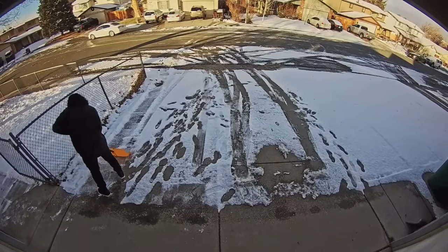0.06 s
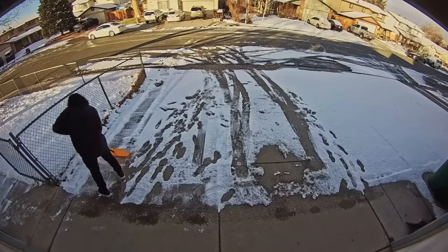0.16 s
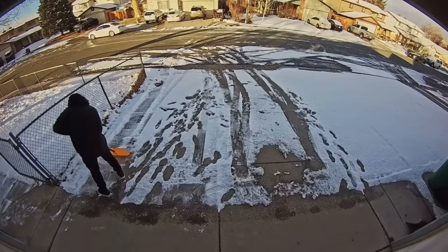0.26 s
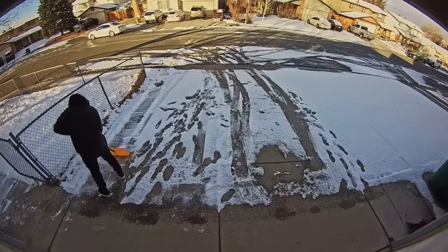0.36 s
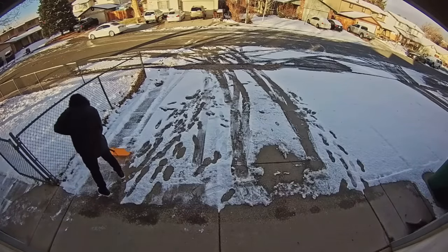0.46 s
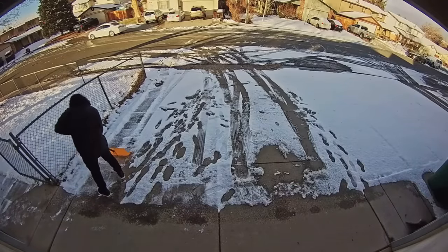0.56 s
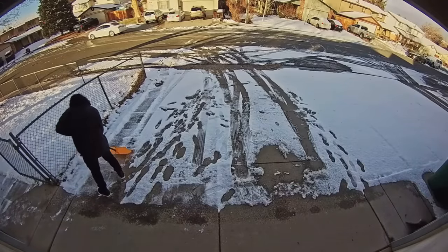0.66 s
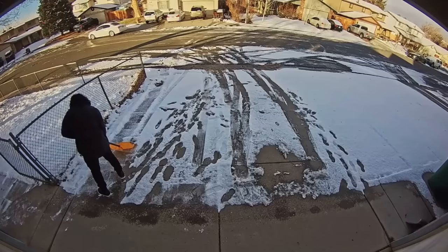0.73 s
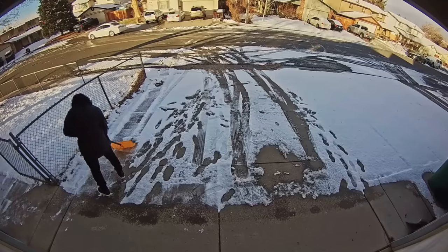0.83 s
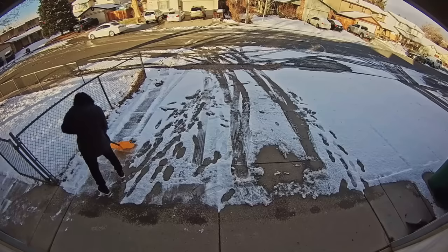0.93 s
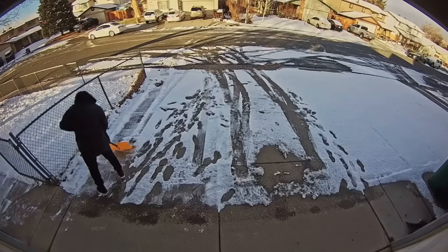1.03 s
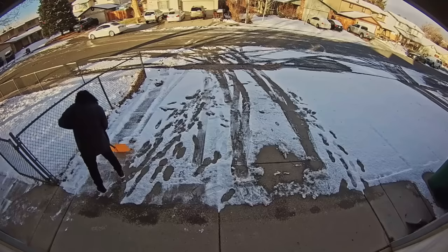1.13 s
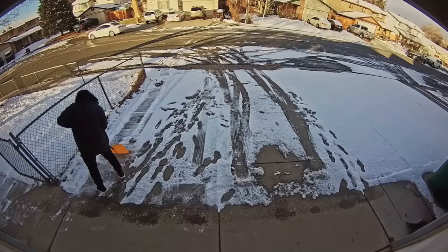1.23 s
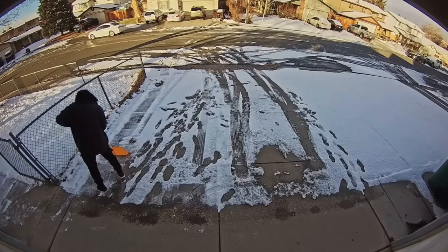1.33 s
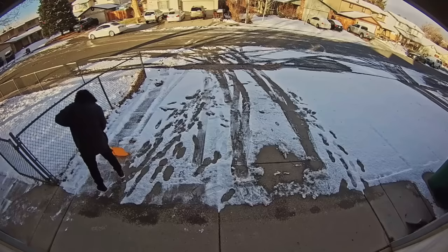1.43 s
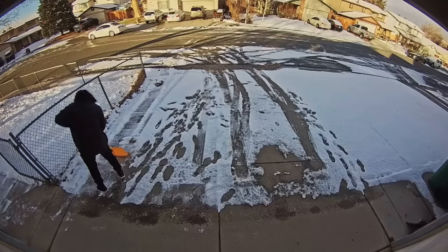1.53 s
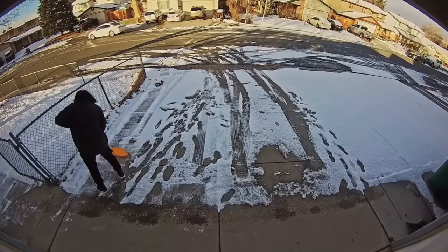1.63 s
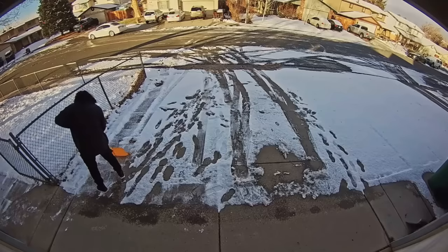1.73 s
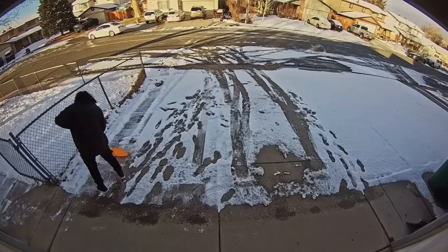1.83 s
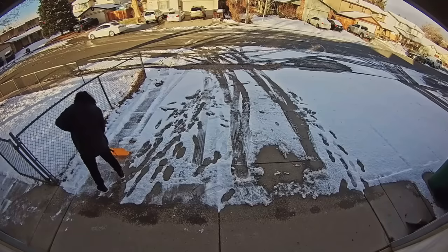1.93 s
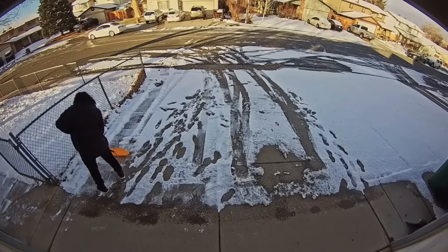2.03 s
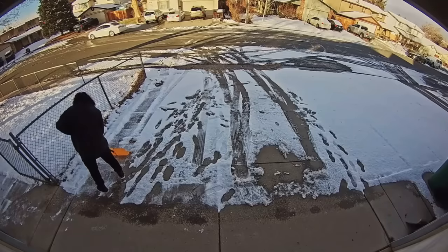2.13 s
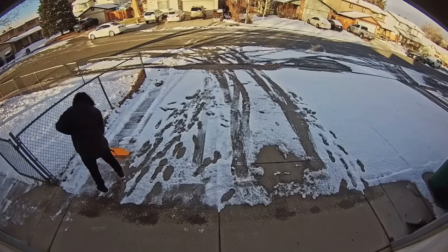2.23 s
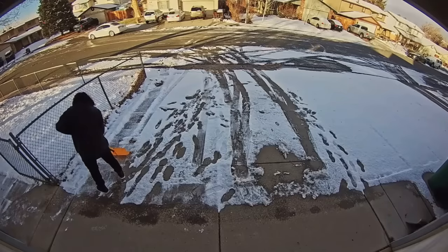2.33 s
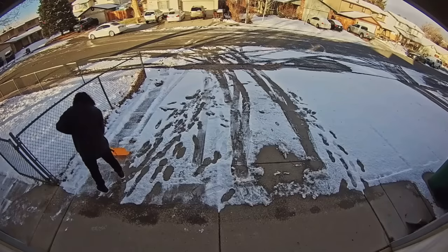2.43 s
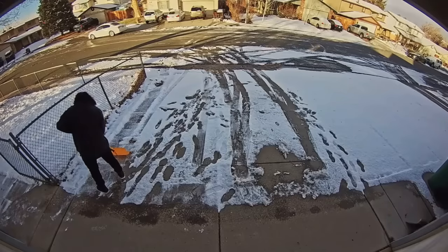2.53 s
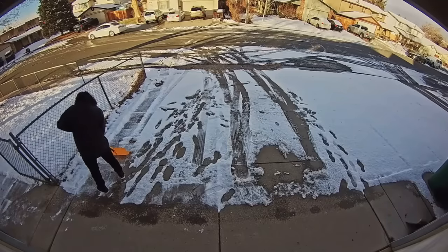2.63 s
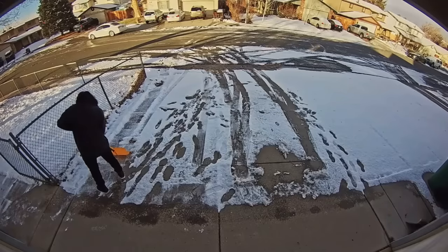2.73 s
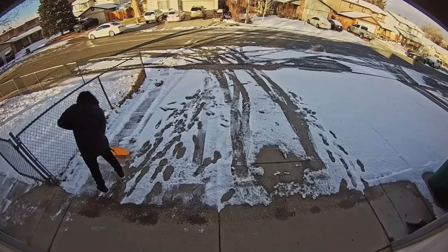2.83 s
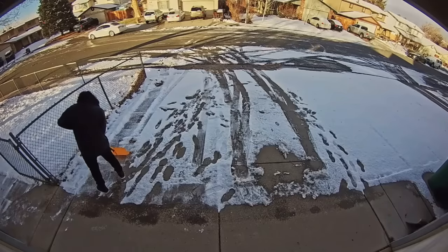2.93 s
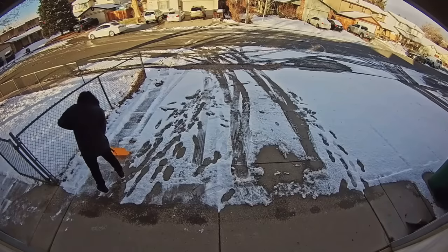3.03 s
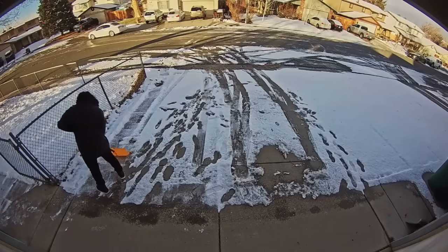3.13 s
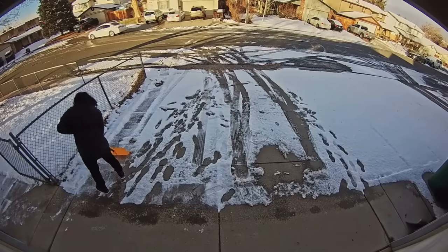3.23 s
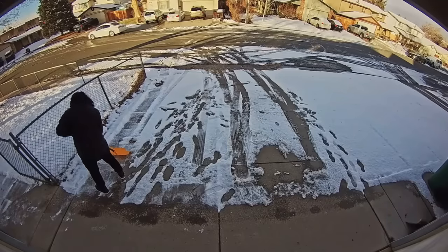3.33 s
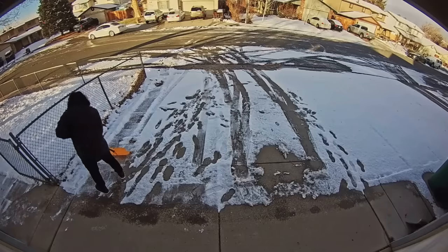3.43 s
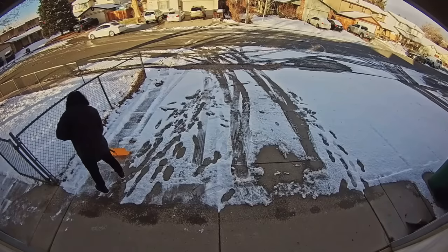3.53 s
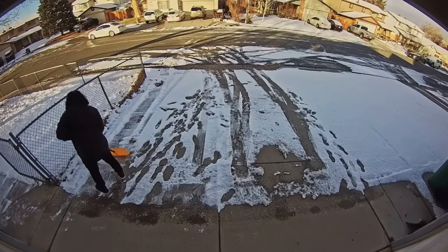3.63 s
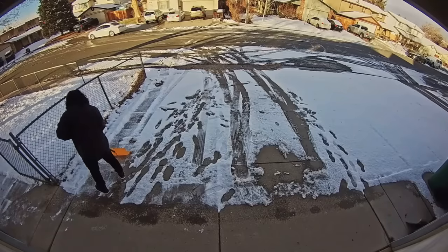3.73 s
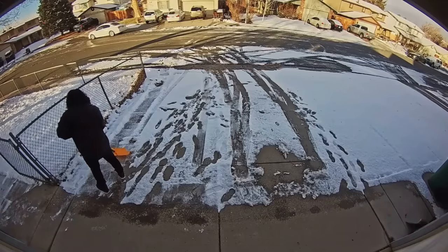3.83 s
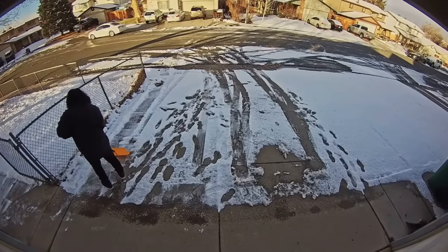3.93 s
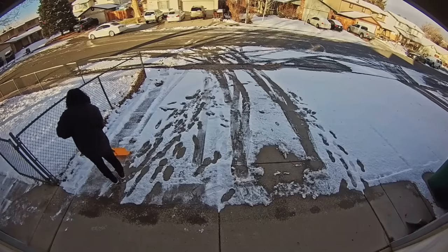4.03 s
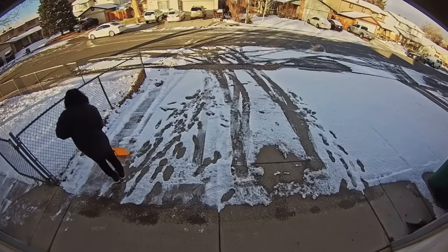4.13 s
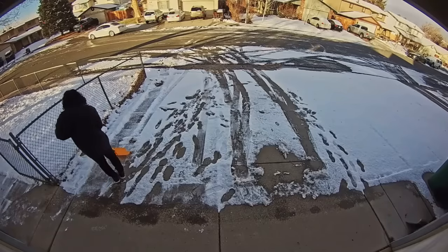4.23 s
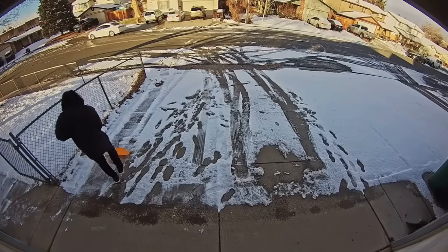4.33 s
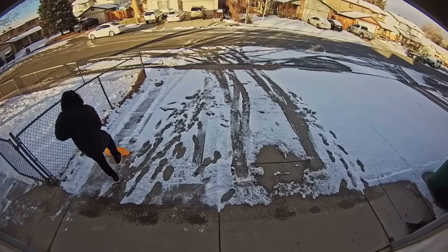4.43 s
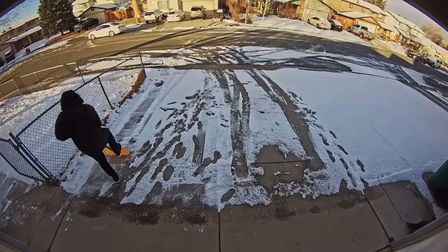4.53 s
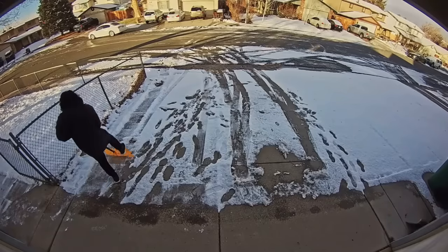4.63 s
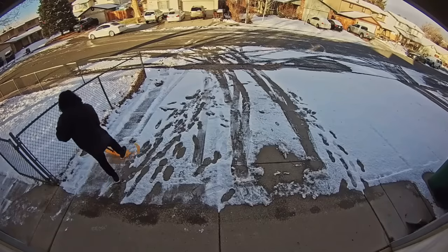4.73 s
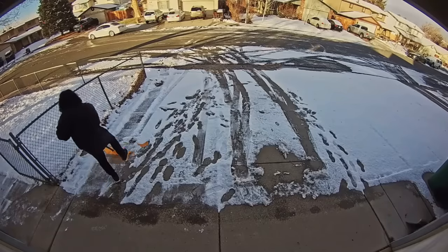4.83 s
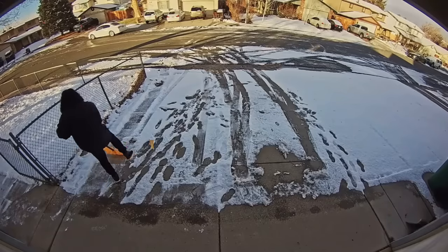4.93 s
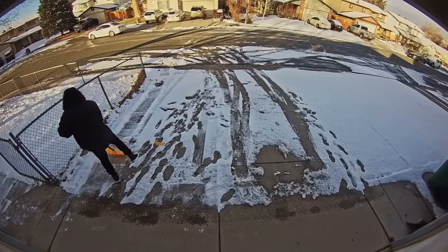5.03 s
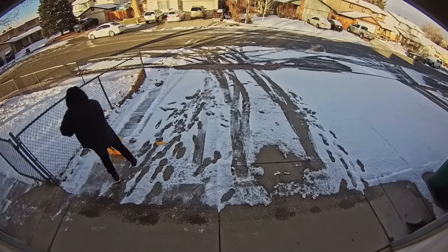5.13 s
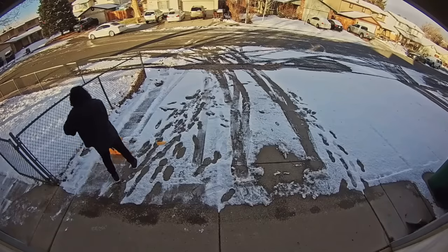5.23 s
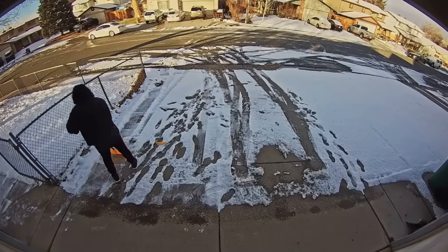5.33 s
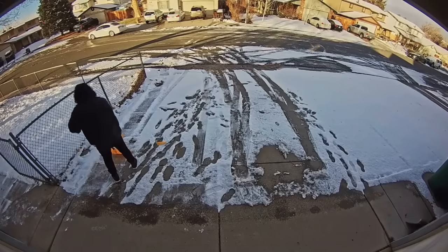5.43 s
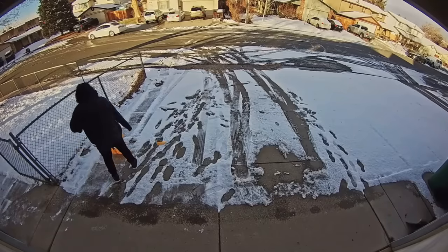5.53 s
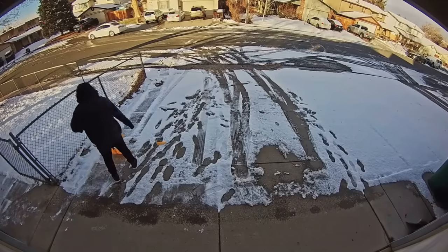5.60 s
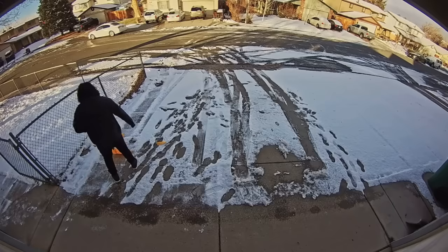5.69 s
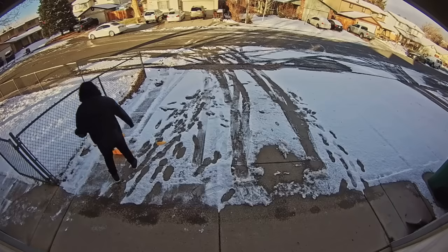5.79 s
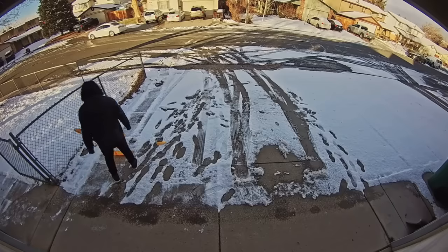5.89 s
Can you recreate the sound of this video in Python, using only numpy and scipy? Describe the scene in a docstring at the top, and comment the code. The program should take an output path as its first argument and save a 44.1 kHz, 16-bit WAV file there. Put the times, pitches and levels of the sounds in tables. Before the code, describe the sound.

Quick plastic scraping and catching on frozen ground, a few creaks, then a sudden violent crack and small clattering pieces outdoors.

```python
"""Snow shovel snapping on ice

A plastic snow shovel scrapes in short strokes over icy concrete, is pried, and is stamped on until it snaps.
A shard skitters off and the broken rest knocks on the ground; a car drones over a faint street hush.
Rubs are showers of tiny slips, and blows are clicks with splinters; both ring the modes of the plastic.
The car is a few sines, the street shaped noise; a narrow-band microphone limits and clips the loudest peaks."""
import sys
import numpy as np
from scipy import signal
from scipy.fft import rfft, irfft
from scipy.io import wavfile
from scipy.ndimage import uniform_filter1d

SR = 44100
rng = np.random.default_rng(int(sys.argv[2]) if len(sys.argv) > 2 else 0)


def inscribe(sig):
    """Save sig as 16-bit PCM at rate SR to the path in sys.argv[1].

    A 1-D sig is mono; a 2-D sig holds one channel per row.
    Samples are clipped to [-1, 1] before scaling.
    """
    pcm = np.round(np.clip(np.atleast_2d(sig).T, -1, 1) * 32767)
    wavfile.write(sys.argv[1], SR, pcm.astype(np.int16))


N = 262836


def amp(db):
    """Decibels to gain."""
    return 10 ** (np.asarray(db) / 20)


def unit(x):
    """Scales to energy 1."""
    return x / np.sqrt(np.sum(x ** 2) + 1e-20)


def add(mix, s, sound):
    """Mixes a sound in at time s."""
    part = mix[max(round(s * SR), 0):][:len(sound)]
    part += sound[:len(part)]


def colour(x, points):
    """Filters by a (Hz, dB) curve, joined by straight lines over log frequency."""
    hz, db = np.transpose(points)
    f = np.fft.rfftfreq(len(x), 1 / SR)
    gain = amp(np.interp(np.log(f + 1), np.log(hz), db))
    return irfft(rfft(x) * gain, len(x))


def band(x, lo_hz, hi_hz, order=3):
    """Causal band-pass."""
    sos = signal.butter(order, [lo_hz, min(hi_hz, .49 * SR)], "band", fs=SR, output="sos")
    return signal.sosfilt(sos, x)


def wander(size, per_s):
    """Random drift around zero with spread about 1, drawn through per_s knots a second."""
    knots = rng.standard_normal(2048)
    drift = np.interp(np.arange(size) * per_s / SR, np.arange(len(knots)), knots)
    return np.sqrt(3 / 2) * drift  # makes up for the spread lost between knots


def plastic(modes, dense_db, t60):
    """One tap on the plastic as boom, middle and grit: main modes over a thicket of short-lived ones."""
    t = np.arange(8000) / SR
    hz, width, db = np.transpose(modes)[:, :, None]
    width = np.clip(width, 30, 400)
    # each point of contact weights the modes a little differently
    weight = amp(db + 1.5 * rng.standard_normal(hz.shape)) * width
    phase = 2 * np.pi * rng.random(hz.shape)
    # a wider resonance dies away faster
    decay = np.exp(-np.pi * width * t)
    ring = (weight * decay * np.sin(2 * np.pi * hz * t + phase)).sum(0)
    thicket = band(rng.standard_normal(len(t)), 190, 9200, order=2) * amp(-60 * t / t60)
    tap = unit(ring) + amp(dense_db) * unit(thicket)
    return [unit(band(tap, lo, hi, order=4)) for lo, hi in [(260, 720), (700, 2230), (2500, 7300)]]


# how fast each part lets go after a stroke: boom, middle, grit [dB/s]
RELEASE_DB_PER_S = [400, 450, 559.5]
# the edge brushes the snow before it bites
BRUSH_S, BRUSH_DB, GRIP_S = .028, -21, 0.011


def rub(strokes, modes, slips_per_s, spread_db, grind, judder_db, judder_per_s, dense_db, t60):
    """Tiny slips of uneven size, in juddering clumps over a fine grinding, ring the plastic."""
    out = np.zeros(N)
    for s, length_s, first_db, last_db, boom_db, grit_db in strokes:
        t = np.arange(-min(BRUSH_S, s), length_s + .13, 1 / SR)
        slips = (rng.random(len(t)) < slips_per_s / SR) * rng.choice([-1, 1], len(t))
        slips = slips * amp(spread_db * np.minimum(rng.exponential(1, len(t)), 3))
        drive = unit(slips) + grind * unit(rng.standard_normal(len(t)))
        drive = drive * amp(judder_db * wander(len(t), judder_per_s))
        # the push of the arms, not the single slip, sets the mean force
        drive = drive / np.sqrt(uniform_filter1d(drive ** 2, size=800) + 1e-20)
        bite = np.interp(t, [-BRUSH_S, -GRIP_S, 0], [0, amp(BRUSH_DB), 1])
        force = amp(np.interp(t, [0, length_s], [first_db, last_db]))
        drive = drive * bite * force
        let_go_s = np.maximum(t - length_s, 0)
        # the load rocks between two points of contact, each with its own ring
        rock = 1.22 * wander(len(t), 25)
        for share in np.cos(rock), np.sin(rock):
            parts = plastic(modes, dense_db, t60)
            for part, db, release in zip(parts, [boom_db, 0, grit_db], RELEASE_DB_PER_S):
                push = drive * share * amp(db - release * let_go_s)
                add(out, s + t[0], signal.fftconvolve(push, part))
    return out


# the plastic gives a little under a blow, so its ring takes a moment to build
YIELD_S = 0.0017


def strike(rows, modes, dense_db, t60, crumble_db, crumble_s):
    """A sharp blow and the few splinters that follow it ring the plastic."""
    out, t = np.zeros(N), np.arange(1500) / SR
    for s, peak_db, boom_db, grit_db in rows:
        low, middle, high = plastic(modes, dense_db, t60)
        landed = rng.random(len(t)) < 1500 / SR
        splinters = rng.standard_normal(len(t)) * landed * np.exp(-t / crumble_s)
        blow = (t == 0) + amp(crumble_db) * unit(splinters)
        ring = amp(boom_db) * low + amp(-7.5) * middle + amp(grit_db) * high
        hit = signal.fftconvolve(blow, ring)
        hit = hit * (1 - np.exp(-np.arange(len(hit)) / SR / YIELD_S))
        # peak of the level over about 3 ms
        peak = np.sqrt(uniform_filter1d(hit ** 2, size=130).max())
        add(out, s, amp(peak_db) * hit / peak)
    return out


# Levels in the stroke and blow tables are before each layer's own gain.
# shoves over the concrete: t/s, length/s, first force/dB, last force/dB,
# boom of the bending blade/dB re force, grit of the edge/dB re force
SHOVES = [(0.0, 0.013, -30.5, -39, -5, -7.5), (0.045, 0.098, -49, -37, -1, -9.5),
          (0.16, 0.08, -31.5, -24, -0.5, -8), (0.332, 0.056, -46, -59, -7, -9),
          (0.485, 0.094, -49.5, -29.5, -3, -10), (0.742, 0.16, -67.5, -60, -5, -0.5),
          (0.88, .092, -34.5, -26.5, 0, -1.5), (0.985, 0.06, -19, -18.5, 2, -1.5),
          (1.07, 0.074, -28.5, -37.5, 1.5, -7), (1.2, 0.15, -39, -40.5, -2.5, -8.5),
          (1.338, 0.17, -31, -34, -2.5, -12.5), (1.578, 0.14, -35.5, -34, 1.5, -12),
          (2.152, 0.017, -50.5, -42, -2, -2), (2.18, 0.063, -30, -20.5, 1.5, -2),
          (2.275, 0.049, -42, -42, 0.5, -14.5), (2.39, 0.17, -73, -68, 9, -22)]
# the edge catches on ice: t/s, peak level/dB, boom/dB, grit/dB
CATCHES = [(0.086, -23, 12, -12), (0.104, -22, -19, -10), (0.159, -21, -7, -12), (0.207, -14, -24, -11),
           (0.503, -23.5, -21, -6), (0.773, -38.5, -32, -4.5), (0.833, -34, -21, -8),
           (0.877, -11, -14.5, -9), (0.973, -10, -1, 1), (1.167, -16, -21, -15.5), (1.181, -16, -21, -24),
           (1.287, -25, -5, -14.5), (1.346, -10.5, -34, -11.5), (1.396, -22, -12, -6.5),
           (1.445, -24, -29, -10.5), (1.589, -23.5, 1, -20.5), (1.989, -42, -28, -8),
           (2.181, -5.5, -29.5, 8), (2.238, -5, 2, -4), (2.333, -25.5, -12, -26), (2.433, -36, -10, -22),
           (2.623, -42, -8.5, -7.5)]
# resonances of the sliding blade: f/Hz, width/Hz (held to 30-400), level/dB
SLIDING = [(330, 135, 2), (506.6, 12, -1.4), (639.5, 29, -5.5), (780, 22, -14.5), (1056, 46, 1),
           (1240, 20, -11.5), (1375, 36, 0.9), (1654, 54, -5.5), (1805, 10, -13.5), (2005, 73, -15.5),
           (2046, 130, -5), (2450, 18, -7.5), (2740, 27, -10.5), (2910, 68, -8.5), (3250, 17, -18),
           (3580, 23, -11), (4030, 28, -15.5), (4290, 33, -11.5), (4330, 110, -14), (4780, 65, -13),
           (5540, 36, -22), (5650, 110, -26.5), (5900, 58, -17.5), (6330, 37, -23)]
# a hard clack of the rim: t/s, peak level/dB, boom/dB, grit/dB
CLACKS = [(0.628, -13.5, -42.5, -12)]
# resonances of the rim: f/Hz, width/Hz, level/dB
RIM = [(1370, 60, -12.5), (1811, 78, -2), (2013, 49, 1.5), (3600, 80, -13), (4897, 60, -13),
       (6000, 90, -17)]


def scraping():
    """The blade edge slips and grinds over the concrete, catches on ice, and the rim clacks once."""
    scrape = rub(SHOVES, SLIDING, slips_per_s=600, spread_db=4.2, grind=.22,
                 judder_db=2.3, judder_per_s=130, dense_db=-8, t60=.06)
    catches = strike(CATCHES, SLIDING, dense_db=-5.0, t60=0.036, crumble_db=0.5, crumble_s=0.0054)
    clacks = strike(CLACKS, RIM, dense_db=-4.5, t60=0.082, crumble_db=-17.5, crumble_s=.003)
    return amp(0.44) * scrape + amp(-8.0) * catches + amp(-3) * clacks


# the loaded blade creaks and grinds on the spot: t/s, length/s, first force/dB, last force/dB,
# boom/dB re force, grit/dB re force
PRYING = [(3.228, 0.023, -42, -43, 6, -1), (3.28, 0.036, -36, -33.5, 2.5, -15),
          (3.358, 0.022, -39, -29.5, -4.5, -16.5)]
# the wedged blade jumps under the lever: t/s, peak level/dB
JUMPS = [(3.083, -49), (3.227, -23), (3.247, -18.5), (3.282, -23), (3.359, -17), (3.381, -18.5),
         (3.494, -37.5), (3.599, -46.5), (3.689, -42.5)]
# resonances of the wedged blade: f/Hz, width/Hz (held to 30-400), level/dB
WEDGED = [(373, 15, -3.5), (495, 18, -2), (630, 25, 1), (820, 26, -7), (1031, 17, 0.5), (1370, 38, -12),
          (1540, 54, -21.5), (1743, 25, -12), (2130, 180, -17.5), (2520, 54, -17), (3440, 200, -14),
          (4610, 120, -16.5), (5460, 34, -20)]
# the harder the blade jumps, the brighter
JUMP_BOOM_DB, JUMP_GRIT_DB, JUMP_GRIT_PER_DB = -10.5, -2, 1.5


def prying():
    """The blade, wedged under the ice, is levered: it creaks under load and jumps."""
    creak = rub(PRYING, WEDGED, slips_per_s=900, spread_db=3, grind=.3,
                judder_db=1.5, judder_per_s=120, dense_db=-13, t60=.05)
    levered = [(s, db, JUMP_BOOM_DB, JUMP_GRIT_DB + JUMP_GRIT_PER_DB * db) for s, db in JUMPS]
    jumps = strike(levered, WEDGED, dense_db=-4, t60=0.038, crumble_db=4, crumble_s=0.0024)
    return amp(2.5) * creak + amp(-8.0) * jumps


# the plastic sticks and slips on one resonance: t/s, length/s, f/Hz, level/dB
SQUEAKS = [(0.0, 0.27, 1365, -40), (0.01, 0.18, 2820, -46.5), (0.048, 0.1, 3600, -42),
           (0.155, 0.078, 1070, -28.5), (0.238, 0.032, 550, -25.5), (0.335, 0.11, 1080, -43.5),
           (0.525, 0.067, 6270, -40.5), (0.56, 0.04, 1047, -25.5), (1.429, 0.029, 4380, -30.5),
           (1.57, 0.034, 4560, -38.5), (1.585, 0.032, 516, -23), (1.69, .085, 491.6, -34),
           (2.301, .03, 1060, -39), (2.328, 0.027, 1370, -42.5), (3.244, .034, 387, -31),
           (3.569, 0.047, 1352, -50.5), (4.37, 0.031, 5180, -39), (4.576, 0.048, 1550, -50),
           (5.32, 0.071, 1863, -28), (5.495, 0.035, 1008, -35), (5.541, 0.193, 3350, -58)]


def squeaks():
    """Short, fuzzy tones as the plastic chatters on one resonance."""
    out = np.zeros(N)
    for s, length_s, hz, db in SQUEAKS:
        size = int(length_s * SR)
        turns = np.cumsum(hz + (20 + .016 * hz) * wander(size, 900)) / SR
        swell = signal.windows.tukey(size, .7) * amp(db + 2 * wander(size, 400))
        add(out, s, swell * np.sin(2 * np.pi * turns))
    return out


# the plastic starts to give under the boot: t/s, length/s, first force/dB, last force/dB,
# boom/dB re force, grit/dB re force
STRAIN = [(4.334, .012, -65.5, -66.5, 5, 6.5), (4.364, 0.052, -49.5, -43, -3.5, 5),
          (4.45, .15, -40, -55.5, -19.5, -9.5)]
# the strained plastic ticks as it first gives: t/s, peak level/dB, boom/dB, grit/dB
TICKS = [(4.391, -16, -45.5, -0.5), (4.44, -27, -20.5, -11)]
# resonances of the strained blade: f/Hz, width/Hz, level/dB
STRAINED = [(1060, 70, -4.5), (1362, 140, -4), (2140, 150, -4.5), (2400, 110, -10), (2940, 90, -13.5),
            (3800, 190, -1), (4400, 130, -7), (5150, 220, -5.5), (6360, 160.4, -13)]


def straining():
    """The plastic groans in coarse slips and ticks before it breaks."""
    strain = rub(STRAIN, STRAINED, slips_per_s=500, spread_db=3.5, grind=.35,
                 judder_db=2, judder_per_s=70, dense_db=-9, t60=.08)
    ticks = strike(TICKS, STRAINED, dense_db=-7, t60=0.035, crumble_db=9.5, crumble_s=0.0045)
    return amp(-1.5) * strain + amp(-5) * ticks


# the split runs through the blade in spurts: t/s, length/s, first force/dB, last force/dB,
# boom/dB re force, grit/dB re force
SPLIT = [(4.884, .016, -37, -41, -10.5, -1.5), (4.914, 0.071, -11, -8.5, 0.5, 1.5),
         (4.988, 0.015, -16, -21.5, 6.5, -3.5), (5.027, 0.007, -16, -15.5, 1.5, -1),
         (5.064, 0.055, -23.5, -22, 8.5, 0.5), (5.13, 0.068, -29, -39, 2.5, 5)]
# the blade cracks: t/s, peak level/dB
CRACKS = [(4.904, 3.5), (4.913, 2), (4.927, 16), (4.94, 6), (4.961, 3.5), (4.977, -10), (5.026, 2.5),
          (5.061, 5.5), (5.109, -6.5)]
# resonances of the split blade: f/Hz, width/Hz (held to 30-400), level/dB
BROKEN = [(425, 49, 3.5), (635.5, 8.8, 1), (1025, 71, 6), (1375, 27, 8.5), (1674, 78, 2.5),
          (2080, 190, 1.5), (2466, 52, -3.5), (2980, 110, -10), (3750, 22, -7)]
# the further the split has run, the more the loose halves boom
CRACK_BOOM_DB, CRACK_BOOM_DB_PER_S, CRACK_GRIT_DB = -25.5, 62, -6


def snapping():
    """The tearing split rasps in spurts under a volley of sharp cracks."""
    split = rub(SPLIT, BROKEN, slips_per_s=1100, spread_db=0.5, grind=0.35,
                judder_db=1.5, judder_per_s=130, dense_db=3.5, t60=0.077)
    volley = []
    for s, db in CRACKS:
        boom_db = CRACK_BOOM_DB + CRACK_BOOM_DB_PER_S * (s - CRACKS[0][0])
        volley.append((s, db, boom_db, CRACK_GRIT_DB))
    cracks = strike(volley, BROKEN, dense_db=8, t60=0.082, crumble_db=2, crumble_s=0.0054)
    return amp(-1.0) * split + amp(-9.0) * cracks


# the blade is rammed into the ice, then stamped on: t/s, level/dB
THUDS = [(0.995, -40.5), (2.232, -33), (4.914, -17)]
# slow bending of shaft and blade: f/Hz, level/dB, t60/s
FLEX = [(92, -10.5, 0.42), (127.7, -1, 0.16), (142, -2.5, 0.38), (170.8, 1.5, 0.34), (265, 3.5, 0.3),
        (298, 4, 0.29)]


def stamp():
    """A heavy shove bends shaft and blade with a dull thud of decaying low modes."""
    out, t = np.zeros(N), np.arange(SR // 2) / SR
    thud = sum(amp(db - 60 * t / t60) * np.sin(2 * np.pi * hz * t) for hz, db, t60 in FLEX)
    # the load builds over a few milliseconds
    thud = thud * (1 - np.exp(-t / 0.0031))
    for s, level_db in THUDS:
        add(out, s, amp(level_db) * thud)
    return out


# the shard slides off over the ice: t/s, length/s, first force/dB, last force/dB,
# boom/dB re force, grit/dB re force
SKITTER = [(5.195, .11, -38.5, -44, -13, 5), (5.335, .083, -41, -48, -28, 6.5),
           (5.428, 0.12, -33, -35.5, -19, -4.5), (5.645, 0.037, -52.5, -57, -5.5, -0.5),
           (5.735, 0.13, -68, -64.5, -19, -1.5)]
# the shard bounces, flat or on an edge: t/s, peak level/dB, boom/dB, grit/dB
BOUNCES = [(5.221, -25.5, -33, -4), (5.243, -16.5, -34, 9), (5.289, -22, -40, 2), (5.322, -10, -29, -10.5),
           (5.361, -15.5, -40, 15), (5.394, -18.5, -37, 11), (5.451, -16, -37, -3.5),
           (5.498, -19, -24, -21)]
# resonances of the loose shard: f/Hz, width/Hz (held to 30-400), level/dB
SHARD = [(1080, 47, 5), (1413, 126, -1.5), (1853, 21, 3), (2390, 160, -6.5), (3097, 53, -4.5),
         (3410, 32, -6), (3980, 31, -20), (4350, 83, -4.5), (5100, 220, -12), (5600, 38, -23),
         (5700, 110, -12), (6870, 45, -4)]


def shard():
    """The loose shard skitters in sparse, uneven slips and bounces."""
    skitter = rub(SKITTER, SHARD, slips_per_s=280, spread_db=4.5, grind=0.27,
                  judder_db=5.0, judder_per_s=65, dense_db=-4, t60=0.089)
    bounces = strike(BOUNCES, SHARD, dense_db=5, t60=0.092, crumble_db=-3.5, crumble_s=0.0062)
    return skitter + amp(-9.0) * bounces


# the broken shovel knocks on the concrete: t/s, peak level/dB, boom/dB, grit/dB
KNOCKS = [(5.844, -31, -22.5, -24), (5.876, -50, -8, -22), (5.946, -33, -29, -13.5)]
# resonances of the stump: f/Hz, width/Hz (held to 30-400), level/dB
STUMP = [(678, 20, 0.5), (1110, 120, -15.5), (1370, 47, -9.5), (2066, 51, 1.5), (4560, 154, -10.5),
         (6360, 140, -11.5)]


def stump():
    """The stump of the shovel rings as it knocks on the ground."""
    knocks = strike(KNOCKS, STUMP, dense_db=-11, t60=0.27, crumble_db=2.5, crumble_s=0.0108)
    return amp(-3.5) * knocks


def yard(x, wet_db=-33, t60=0.58):
    """Fence and houses scatter a little sound back as a faint, sparse tail."""
    t = np.arange(SR) / SR
    taps = rng.standard_normal(SR) * (rng.random(SR) < 2000 / SR) * (t > .015)
    tail = unit(band(taps, 400, 3500, order=1) * amp(-60 * t / t60))
    return x + amp(wet_db) * signal.fftconvolve(x, tail)[:N]


# engine in the street, revving up and easing off: t/s, firing rate f/Hz, level/dB
ENGINE = [(0, 89.1, -56.5), (0.6, 97, -59.5), (0.75, 93.04, -62), (1.4, 102, -64.5), (1.899, 109.1, -61),
          (2.12, 113.3, -45.5), (2.381, 127.6, -60), (2.5, 134.1, -47.5), (2.8, 134.6, -49.5),
          (3.3, 139.3, -41.5), (3.87, 146.2, -49.5), (4.319, 143.8, -48.5), (4.56, 135, -57.5),
          (4.66, 131, -84.5), (5.3, 123, -66), (5.68, 109.4, -73), (5.96, 105, -73)]
# partials of the exhaust: multiple of the firing rate, level/dB
ENGINE_ORDERS = [(1, -2), (1.5, -23), (2, -26.5), (2.5, -23.5)]


def car():
    """The exhaust drones, rising and falling with the engine's speed."""
    s, hz, db = np.transpose(ENGINE)
    t = np.arange(N) / SR
    turns = np.cumsum(np.interp(t, s, hz) * (1 + 0.019 * wander(N, 22))) / SR
    drone = sum(amp(order_db) * np.sin(2 * np.pi * k * turns) for k, order_db in ENGINE_ORDERS)
    level = amp(np.interp(t, s, db) + 0.85 * wander(N, 9.4))
    return np.sqrt(2) * drone * level


# spectral shape of the street noise: f/Hz, relative level/dB
STREET = [(24, -57.5), (40, -35.5), (86, -11.5), (136, -6), (161, -13), (184, -11), (297, -19.5),
          (338, -16), (440, -22), (5630, -37), (7310, -38), (9500, -70), (16100, -120)]
# the background hush sinks just before the snap: t/s, level/dB re STREET_DB
HUSH = [(0, 4), (4.58, -3.5), (4.67, -6), (4.848, -5), (5.3, -6), (5.96, -4)]
STREET_DB = -67  # reference level of the 500-7000 Hz band


def street():
    """Faint rumble and hiss of the neighbourhood: shaped noise with a drifting level."""
    air = colour(rng.standard_normal(N), STREET)
    air = air / np.std(band(air, 500, 7000))
    hush_db = np.interp(np.arange(N) / SR, *np.transpose(HUSH))
    return air * amp(STREET_DB + hush_db + 0.91 * wander(N, 7.8))


def scene():
    """Shovel in the yard, street behind."""
    shovel = scraping() + prying() + squeaks() + straining() + snapping() + stamp() + shard() + stump()
    return (yard(shovel) + car() + street())[None]


def limit(x, threshold_db, ratio, recover_db_per_s):
    """Quick gain control holds down the loudest moments."""
    power_db = 10 * np.log10(abs(uniform_filter1d(x ** 2, size=130)) + 1e-12)
    # the tracked level jumps up at once and falls back steadily
    fall = np.arange(N) * recover_db_per_s / SR
    tracked_db = np.maximum.accumulate(power_db + fall) - fall
    over_db = np.maximum(tracked_db - threshold_db, 0)
    return x / amp((1 - 1 / ratio) * uniform_filter1d(over_db, size=90))


# response of the narrow-band microphone: f/Hz, level/dB
MICROPHONE = [(30, -9.5), (90, -1), (200, -5), (6300, -0.5), (7000, -7.5), (7350, -20.5), (7700, -38.5),
              (8200, -75)]
EDGE_HZ = 15800  # final low-pass


def record(dry):
    """The microphone dulls the top; peaks past its limiter clip and spill above its band, up to the edge."""
    held = limit(colour(dry[0], MICROPHONE), threshold_db=-5, ratio=4, recover_db_per_s=600)
    heard = np.clip(held, -.98, .98)
    low_pass = signal.firwin(511, EDGE_HZ, window=("kaiser", 9), fs=SR)
    return signal.fftconvolve(heard, low_pass, "same")[None]


dry = scene()
out = record(dry)
inscribe(out)
```